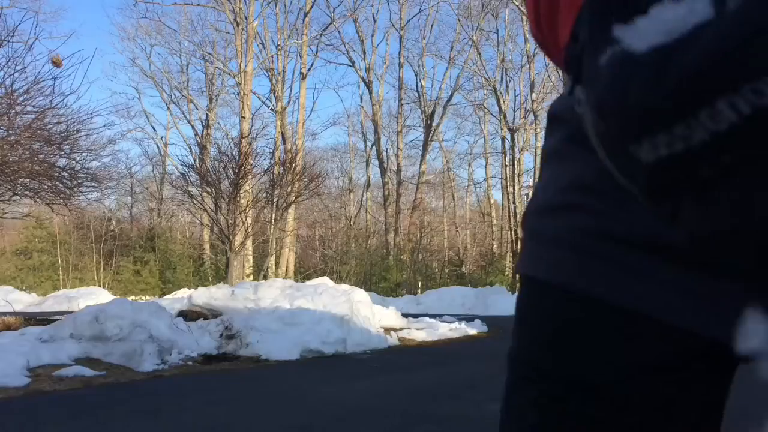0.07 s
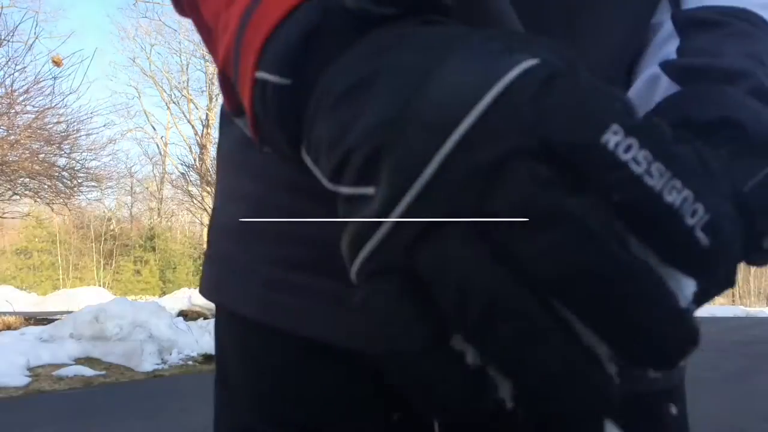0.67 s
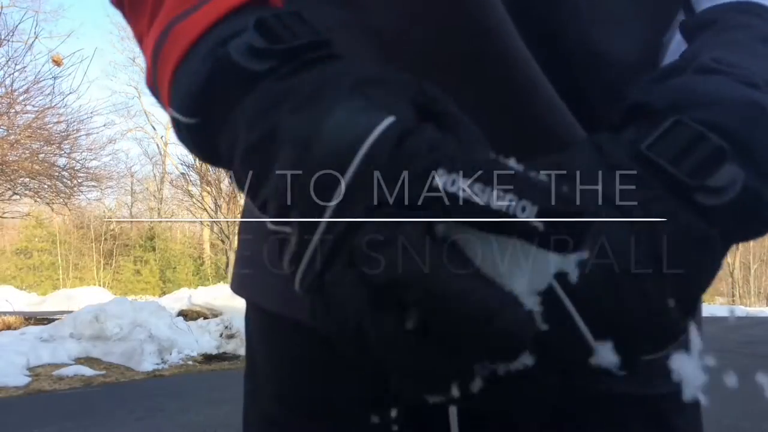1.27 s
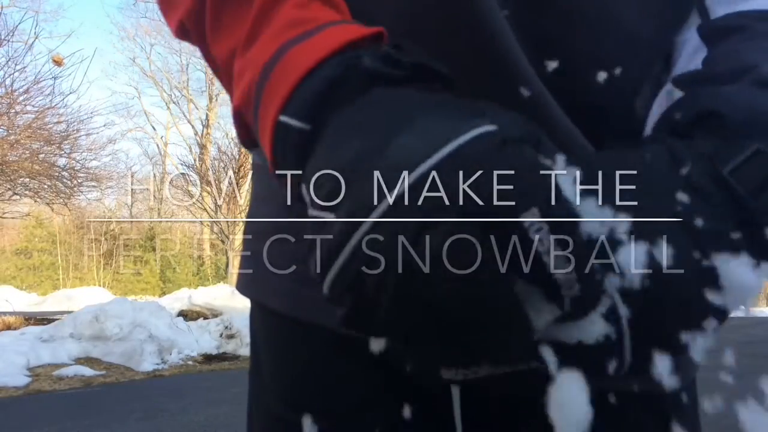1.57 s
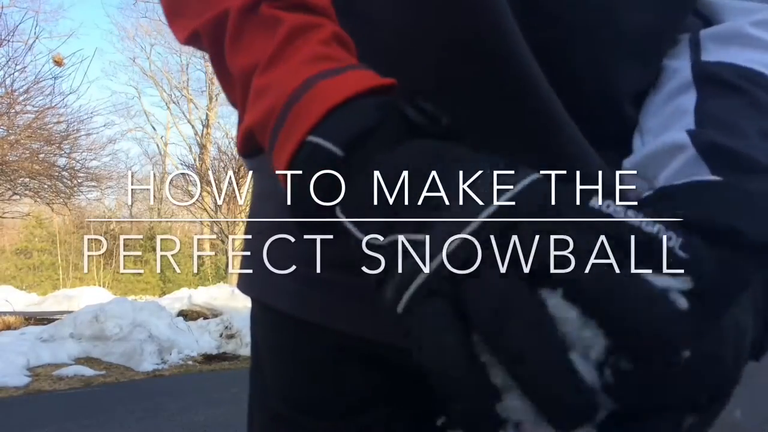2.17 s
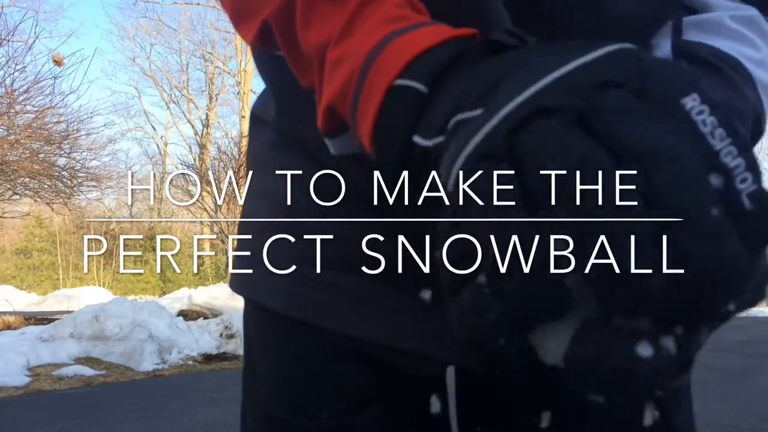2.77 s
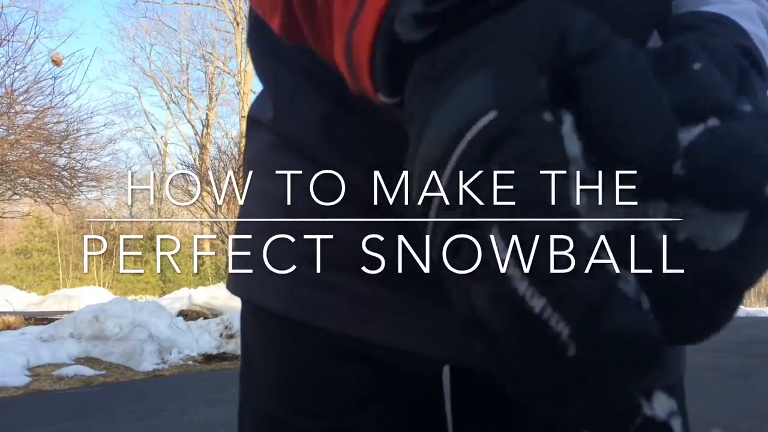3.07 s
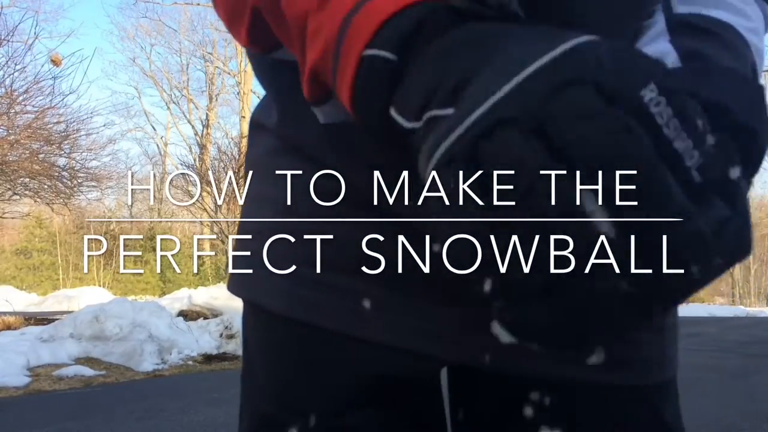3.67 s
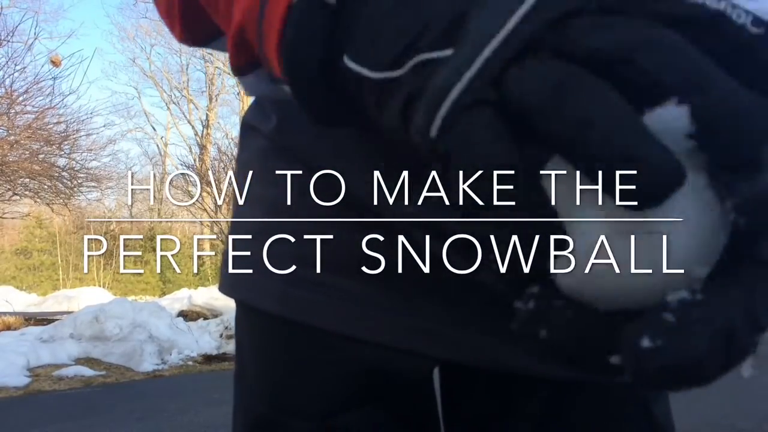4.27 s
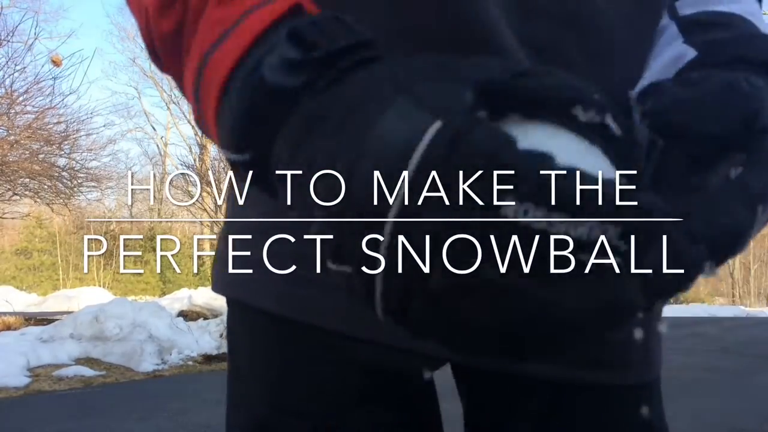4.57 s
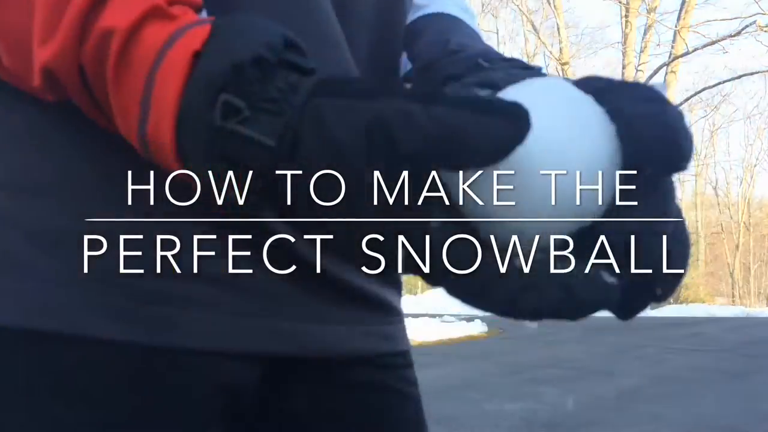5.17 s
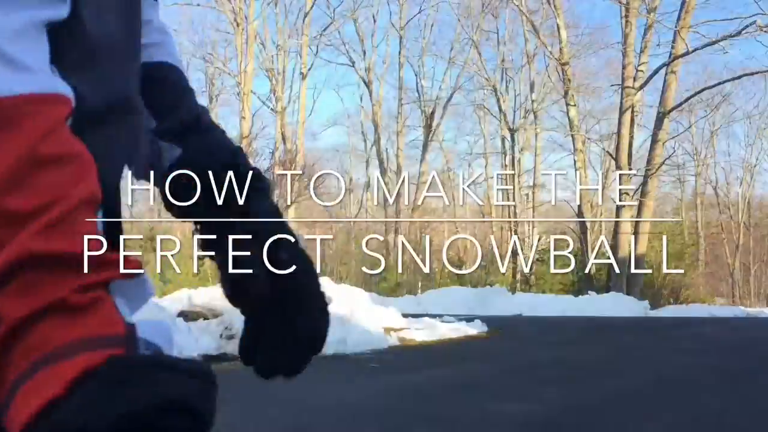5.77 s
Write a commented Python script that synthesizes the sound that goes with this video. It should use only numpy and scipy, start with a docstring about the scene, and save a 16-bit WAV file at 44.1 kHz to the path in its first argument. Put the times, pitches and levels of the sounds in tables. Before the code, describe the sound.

Gloved hands pack a snowball outdoors, very close and with no echo. Irregular rasping strokes of cloth on snow come with crisp crunches and tiny icy clicks, busy at first, then lighter, with a last firm scrape near the end. Now and then a dropped clump of snow taps the stand with a faint ring. Soft, low wind buffets come and go on the microphone over a barely audible hush of far trees.

```python
"""Two padded gloves pack a snowball outdoors, right in front of a small camera's one microphone.
Each stroke scrapes thousands of ice grains; the crust gives way in short crunches and single snaps.
Falling clumps knock the camera's stand. Light wind puffs at the microphone,
and faint air moves in the distant trees."""
import sys
import numpy as np
from scipy import signal
from scipy.fft import rfft, irfft, next_fast_len
from scipy.io import wavfile
from scipy.ndimage import uniform_filter1d, map_coordinates

SR = 44100
rng = np.random.default_rng(int(sys.argv[2]) if len(sys.argv) > 2 else 0)


def master_out(mix):
    """Clip the mix to full scale and print it as 16-bit PCM to the path in sys.argv[1]."""
    frames = np.transpose(np.atleast_2d(mix))
    ceiling = np.clip(frames, -1, 1)
    pcm = np.round(ceiling * 32767).astype(np.int16)
    wavfile.write(sys.argv[1], SR, pcm)


N = 256662

# glove strokes, close up: (peak time [s], hiss level [dB], rise [s], fall [s],
# scrub relative to hiss [dB], resonance of the hollow between the palms [Hz])
GLOVE_STROKES = [(0.46, -32.5, 0.064, 0.094, -.5, 950), (0.532, -28.5, 0.043, 0.025, -4, 1310),
                 (0.63, -37, 0.049, 0.031, 2.5, 526), (0.685, -34.5, 0.023, 0.033, 2, 770),
                 (0.755, -31.5, 0.026, 0.025, 0.5, 1280), (0.87, -34.5, 0.059, 0.027, 1, 920),
                 (0.917, -28, 0.055, 0.044, -4, 1140), (1.16, -32.5, 0.045, 0.051, -5, 1000),
                 (1.215, -34.5, .03, 0.11, -5.5, 1100), (1.36, -29, .02, 0.032, -3.5, 1380),
                 (1.529, -33, 0.053, 0.031, -6, 1300), (1.584, -27, 0.014, 0.051, -2.5, 1580),
                 (1.92, -31.5, 0.11, 0.065, -5, 1200), (2.15, -27, 0.04, 0.06, -5, 1160),
                 (2.275, -31.5, 0.03, 0.026, -6, 1300), (2.319, -29.5, 0.039, 0.033, -4, 1130),
                 (2.645, -32, 0.028, 0.026, -1.5, 1520), (2.76, -33, 0.076, 0.034, -3, 1280),
                 (2.94, -29, 0.027, 0.026, -2.5, 1440), (3.061, -36, .03, 0.027, -3.5, 1380),
                 (3.186, -29, 0.037, 0.06, -3.5, 1240), (3.281, -43, .04, 0.11, -3, 1220),
                 (3.418, -33, 0.041, 0.048, -5, 1260), (3.511, -31, 0.078, 0.039, -2.5, 810),
                 (3.66, -37.5, 0.12, 0.085, -1.5, 1160), (3.871, -37.5, 0.063, 0.042, -7, 1200),
                 (4.491, -34.5, 0.042, 0.049, -1.5, 1520), (4.545, -36, 0.018, 0.043, -8, 1160),
                 (4.742, -42.5, 0.027, 0.011, 1.5, 1720), (4.816, -45, .02, .02, -1, 1010),
                 (4.93, -48.5, 0.039, 0.027, 4.5, 1350), (5.004, -50, 0.0064, 0.0056, 11, 1420),
                 (5.144, -44.5, 0.023, 0.11, -5, 900), (5.41, -31.5, 0.039, 0.033, -3.5, 1670),
                 (5.53, -46.5, 0.078, 0.04, -2, 1200)]
# light rustle of cloth and loose snow between the strokes: (time [s], level [dB])
RUSTLE_LEVELS = [(0.13, -51), (0.2, -59.5), (0.3, -46.5), (0.8, -48), (1.06, -53.5), (1.3, -48),
                 (1.45, -53.5), (1.7, -52.5), (2.2, -48.5), (2.4, -50), (2.84, -44), (3.35, -44),
                 (4.0, -45.5), (4.28, -57), (4.42, -42.5), (4.65, -47), (5.08, -54), (5.22, -51),
                 (5.48, -52), (5.62, -66.5), (5.82, -64)]
# the crust gives way: (time [s], level [dB], length [s])
CRUST_CRUNCHES = [(0.603, -31.5, 0.011), (0.624, -34, 0.0046), (0.682, -39, .008), (0.761, -30, 0.0085),
                  (1.058, -37, 0.0076), (1.089, -33.5, 0.0089), (1.129, -32, .007), (1.192, -27, .008),
                  (1.405, -34, 0.021), (1.56, -22, 0.016), (1.603, -24, .011), (1.728, -29.5, 0.013),
                  (1.773, -27.5, 0.021), (2.028, -31.5, 0.016), (2.503, -32.5, 0.018),
                  (2.521, -33.5, 0.031), (2.585, -35, 0.0073), (2.922, -30, .01), (2.995, -37, 0.014),
                  (4.308, -40.5, 0.047), (4.354, -33.5, 0.041), (5.494, -37.5, 0.011), (5.734, -43, 0.014)]
# single crystals break: (time [s], level [dB], pitch [Hz])
CRYSTAL_SNAPS = [(0.3132, -21, 1910), (0.3731, -27, 7300), (0.58, -29, 1210), (0.5985, -13, 3550),
                 (0.6088, -15, 2420), (0.7164, -19, 7980), (1.1406, -16, 7860), (1.1964, -19, 6520),
                 (1.3334, -17.5, 3070), (1.5364, -16.5, 1670), (2.3274, -36, 1090), (2.8504, -23, 1200),
                 (2.892, -10.5, 1940), (3.571, -20.5, 3890), (4.1116, -24, 1210), (4.1647, -13.5, 6840),
                 (4.1728, -26, 6910), (4.4878, -17, 1940), (4.4964, -26, 1210), (4.5336, -9.5, 7600),
                 (4.541, -16, 4860), (4.815, -24, 4480), (5.1037, -29, 3300)]
# clumps hit the stand: (time [s], low ring level [dB], thin ring level [dB])
CLUMP_KNOCKS = [(0.945, -45.5, -34), (1.608, -43, -46), (1.94, -46, -34), (2.524, -34.5, -33.5),
                (2.551, -34.5, -55), (2.867, -48.5, -34), (4.365, -38, -40)]
# modes of the stand under the camera: (frequency [Hz], relative level [dB], time to fall 60 dB [s])
STAND_MODES = [(236, 4.5, 0.12), (295, -8, 0.32), (327, 0, 0.45), (369.6, 6, 0.26), (408, 0.5, 0.24),
               (489, -2, 0.29), (5700, -13, .14), (6050, 1, .16), (6350, 6, 0.18)]
# wind on the microphone: (time [s], level [dB])
WIND_LEVELS = [(0.13, -56), (0.23, -41), (0.34, -65), (0.49, -54), (0.6, -65), (0.95, -47), (1.08, -70),
               (1.35, -51.5), (1.47, -66), (1.62, -61), (1.77, -40), (1.83, -30.5), (2.02, -41),
               (2.25, -59), (2.47, -62.5), (2.59, -38.5), (2.72, -53), (3.02, -59), (3.14, -42),
               (3.25, -59), (3.42, -49), (3.55, -49.5), (3.7, -44.5), (3.9, -39.5), (4.0, -52.5),
               (4.08, -42.5), (4.39, -45), (4.64, -65), (4.86, -43), (5.04, -53.5), (5.2, -34.5),
               (5.42, -65), (5.62, -48), (5.82, -38)]
# soft shoves of air on the microphone: (peak time [s], level [dB], pitch [Hz], half-width [s])
WIND_PUFFS = [(0.18, -26.5, 81, .014), (1.74, -30, 112, .007), (1.82, -29, 86, .012),
              (1.888, -25.5, 98.9, .03), (2.036, -28, 102.4, .011), (3.142, -39.5, 167, .014),
              (3.756, -25.5, 149.6, 0.0069), (3.915, -28, 117, 0.015), (4.538, -37.5, 123, 0.011),
              (5.185, -29, 73, .018), (5.215, -22.5, 101, .01), (5.744, -27.5, 71, .012)]
# spectra of ice grains, padded cloth, wind buffet and far trees: (frequency [Hz], relative level [dB])
ICE_SPECTRUM = [(1060, -23.5), (1800, 4.5), (2500, 1), (6370, -0.5), (12800, -4.5), (14700, -9.5),
                (15400, -11.5), (15800, -81)]
GLOVE_SPECTRUM = [(100, -20), (250, -12.5), (500, -6.5), (750, -2.5), (1100, 1.5), (1700, 2), (2400, -6),
                  (4000, -34)]
BUFFET_SPECTRUM = [(15, -4), (30, -12.5), (50, 6.5), (90, 5), (140, -5), (220, -16), (400, -25),
                   (900, -42.5)]
TREE_SPECTRUM = [(30, 0.5), (200, -1), (600, -6.5), (2000, -29.5), (8000, -38), (15000, -22)]


def glove_strokes():
    """Gloves scrape snow at the microphone: a firm stroke is a dense rush, a light one crackles."""
    t = np.arange(N) / SR
    hiss_power = amp(curves(RUSTLE_LEVELS)[0] + 1.7 * wobble(25)) ** 2
    scrub_power, hollow = hiss_power * amp(-2.5) ** 2, np.zeros(N)
    for s, db, rise, fall, scrub_db, hz in GLOVE_STROKES:
        near = np.flatnonzero(abs(t - s) < .3)
        since = t[near] - s
        push = amp(db) * np.exp(-(since / np.where(since < 0, rise, fall)) ** 2)
        hiss_power[near] += push ** 2
        scrub_power[near] += (push * amp(scrub_db)) ** 2
        # each grip closes a different hollow between the palms
        hollow[near] += push * amp(scrub_db) * resonant_noise(len(near), hz, q=1.48)
    hiss_level = np.sqrt(hiss_power)
    crackle = grains(per_second=6000 * (hiss_level / amp(-32)) ** .8, spread_db=2.5)
    ice = coloured(.68 * crackle + .67 * rng.standard_normal(N), ICE_SPECTRUM)
    # a light touch breaks fewer of the finest crystals, so it sounds duller
    dull_ice = signal.lfilter(*signal.butter(1, 6500, fs=SR), ice)
    ice = dull_ice + (ice - dull_ice) * (hiss_level / amp(-33.5)) ** .16
    # the same grains shake the padded cloth
    cloth = coloured(.73 * crackle + .67 * rng.standard_normal(N), GLOVE_SPECTRUM)
    # the gloves catch and slip, so the grains come in clumps
    slip = amp(1.04 * wobble(60) + 1.53 * wobble(260))
    body = amp(-4) * np.sqrt(scrub_power) * cloth + amp(-9) * hollow
    rush = slip * (amp(-1.2) * hiss_level * ice + amp(1.3 * wobble(90)) * body)
    return rush + crumbs(hiss_level)


def crumbs(hiss_level):
    """Coarse crystals tick one by one; they stand out most when the hands move gently."""
    ticks = grains(per_second=55, spread_db=3.5)
    pressure = (hiss_level / amp(-45)) ** .6
    return pressure * snow_in_gloves(ticks, ice_db=-54.5, cloth_db=-55.5)


def crust_crunches():
    """A patch of crust collapses in a quick avalanche of grains."""
    force = np.zeros(N)
    for s, db, length in CRUST_CRUNCHES:
        progress = np.arange(round(2 * length * SR)) / (length * SR)
        add(force, s, amp(db) * np.minimum(progress / .25, 1) / (1 + progress ** 8))
    breaks = grains(per_second=9000, spread_db=6.5)
    return force * snow_in_gloves(breaks, ice_db=-1, cloth_db=-8)


def snow_in_gloves(breaks, ice_db, cloth_db):
    """Breaking grains sound bright from the ice and dull through the padded cloth."""
    ice, cloth = coloured(breaks, ICE_SPECTRUM), coloured(breaks, GLOVE_SPECTRUM)
    return amp(ice_db) * ice + amp(cloth_db) * cloth


def hand_shading(x, depth_db):
    """The moving hands shade and reflect the sound, so narrow bands come and go at the microphone."""
    bands = signal.stft(x, nperseg=512)[2]
    shade = uniform_filter1d(rng.standard_normal(bands.shape), size=6, axis=0)  # smooth over frequency
    shade = uniform_filter1d(shade, size=12, axis=1)  # and over time
    return signal.istft(bands * amp(depth_db * unit(shade)), nperseg=512)[1][:N]


def crystal_snaps(cycles=6, crack_hz=7000):
    """One crystal breaks close by: a sharp crack, a ping of very few cycles and some splinters."""
    out, t = np.zeros(N), np.arange(SR // 50) / SR
    ping = lambda hz: np.sin(2 * np.pi * hz * t) * amp(-60 * t * hz / cycles)
    for s, db, hz in CRYSTAL_SNAPS:
        splinters = rng.standard_normal(len(t)) * amp(-19.5 - 60 * t / .013)
        tone = amp(1) * (hz / crack_hz) ** .52 * ping(hz)
        add(out, s + .0012, amp(db) * (ping(crack_hz) + tone + splinters))
    return out


def stand_knocks():
    """Each clump lands with a dull bump and rings the camera stand's low and thin modes."""
    out, t = np.zeros(N), np.arange(SR // 2) / SR
    attack = 1 - np.exp(-t / .0012)
    for s, low_db, thin_db in CLUMP_KNOCKS:
        ring = np.zeros(len(t))
        for hz, db, t60 in STAND_MODES:
            strike_db = (low_db if hz < 1000 else thin_db) + db + rng.normal(0, 1)
            phase = 2 * np.pi * (hz * t + rng.random())
            # loose joints roughen the ring, most of all its high modes
            rattle = np.interp(t, np.linspace(0, t[-1], 60), rng.standard_normal(60))
            ring += amp(strike_db - 60 * t / t60) * np.sin(phase + .5 * np.sqrt(hz / 1000) * rattle)
        bump = resonant_noise(len(t), hz=295, q=1.1) * amp(low_db + 2 - 60 * t / .1)
        add(out, s, (amp(-5) * ring + bump) * attack)
    return out


def microphone_wind():
    """Light wind flutters right on the microphone, with a few soft shoves of air."""
    eddies_db = 4 * np.tanh(wobble(24))
    level = amp(curves(WIND_LEVELS)[0] - .5 + eddies_db)
    flutter = level * coloured(rng.standard_normal(N), BUFFET_SPECTRUM)
    for s, db, hz, width in WIND_PUFFS:
        t = np.arange(round(6 * width * SR)) / SR - 3 * width
        # a few uneven swings of pressure, with smaller and faster eddies at the peak
        swing_hz = hz * np.exp(.23 * wobble(166.6)[:len(t)])
        phase = 2 * np.pi * (np.cumsum(swing_hz) / SR + rng.random())
        swell = np.exp(-(t / width) ** 2)
        swings = np.sin(phase) + amp(-9) * swell * np.sin(1.8 * phase)
        add(flutter, s + t[0], amp(db + .5) * swell * swings)
    return flutter


def distant_trees():
    """Faint steady air in the trees, far from the microphone."""
    return amp(-63) * coloured(rng.standard_normal(N), TREE_SPECTRUM)


def amp(db):
    """Decibels to gain."""
    return 10 ** (np.asarray(db) / 20)


def unit(x):
    """Scaled to rms 1."""
    return x / np.sqrt(np.mean(x ** 2) + 1e-20)


def curves(rows):
    """One value per sample for each column after the time."""
    times, *columns = np.transpose(rows)
    return [np.interp(np.arange(N) / SR, times, column) for column in columns]


def wobble(rate):
    """A smooth random curve, rate knots a second."""
    return map_coordinates(rng.standard_normal(int(N * rate / SR) + 4), [np.arange(N) * rate / SR])


def add(track, s, sound):
    """Mix a sound into the track from time s on."""
    start = max(round(s * SR), 0)
    part = track[start:start + len(sound)]
    part += sound[:len(part)]


def coloured(x, spectrum):
    """x through a causal filter with the given spectrum, scaled to rms 1."""
    size = 2 * next_fast_len(N // 2 + SR // 4)
    hz, db = np.transpose(spectrum)
    gain = amp(np.interp(np.log(np.fft.rfftfreq(size, 1 / SR) + 1), np.log(hz), db))
    # minimum phase: nothing rings ahead of a click
    cepstrum = irfft(np.log(np.maximum(gain, 1e-4)))
    cepstrum[1:size // 2] *= 2
    cepstrum[size // 2 + 1:] = 0
    return unit(irfft(rfft(x, size) * np.exp(rfft(cepstrum)), size)[:N])


def resonant_noise(samples, hz, q):
    """Noise passed twice through one resonance, rms 1."""
    b, a = signal.iirpeak(hz, q, SR)
    return unit(signal.lfilter(b, a, signal.lfilter(b, a, rng.standard_normal(samples))))


def grains(per_second, spread_db):
    """Random impulses of uneven size, rms 1 whatever their rate."""
    chance = np.clip(per_second / SR, 1e-4, 1)
    sizes = amp(spread_db * np.clip(rng.standard_normal(N), -2, 2)) * rng.choice([-1, 1], N)
    return unit((rng.random(N) < chance) * sizes / np.sqrt(chance))


def scene():
    """Hands close, trees far off: all reach one microphone in the open, with no walls to answer."""
    snowball = hand_shading(glove_strokes() + crust_crunches(), depth_db=1.56) + crystal_snaps()
    mono = snowball + stand_knocks() + microphone_wind() + distant_trees()
    return np.array([mono, mono])


def record(dry, silence_s=.118, fade_s=.015, top_hz=15700):
    """The sound fades in after a moment of silence, and the camera holds nothing above top_hz."""
    opening = np.clip((np.arange(N) / SR - silence_s) / fade_s, 0, 1)
    size = next_fast_len(N + SR // 4)
    passband = np.fft.rfftfreq(size, 1 / SR) < top_hz
    return irfft(rfft(dry * opening, size) * passband, size)[:, :N]


dry = scene()
out = record(dry)
master_out(out)
```